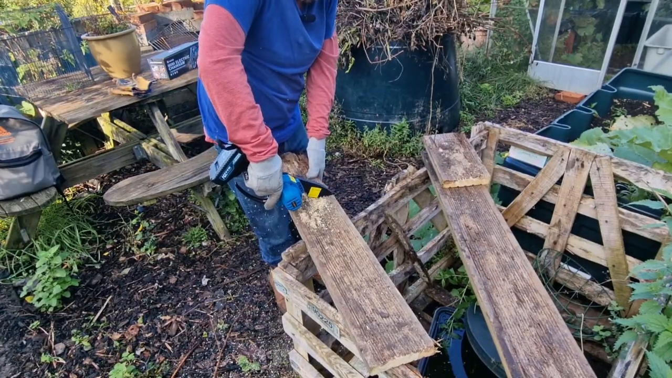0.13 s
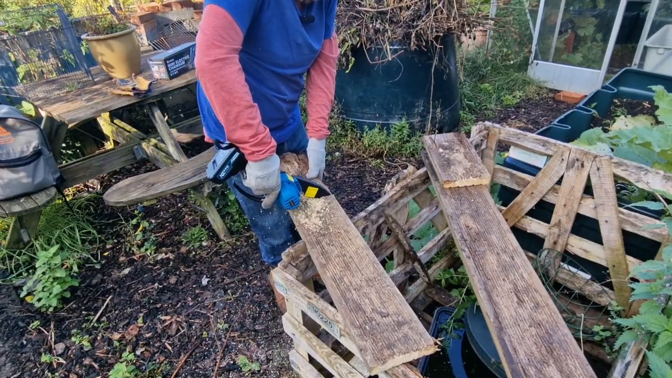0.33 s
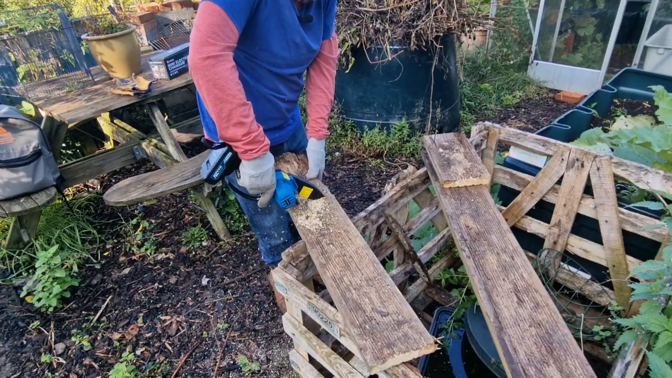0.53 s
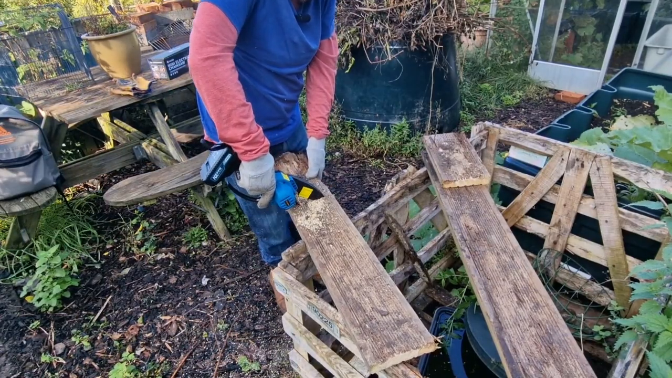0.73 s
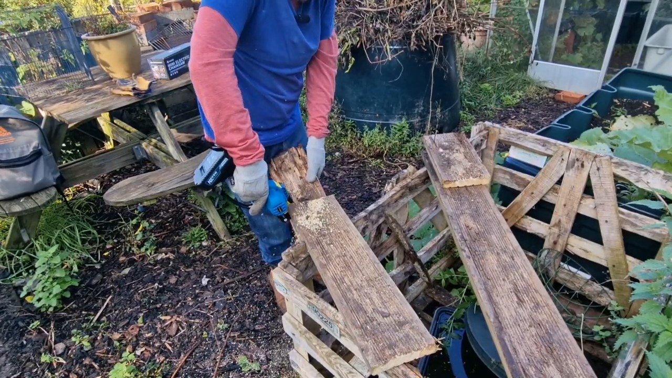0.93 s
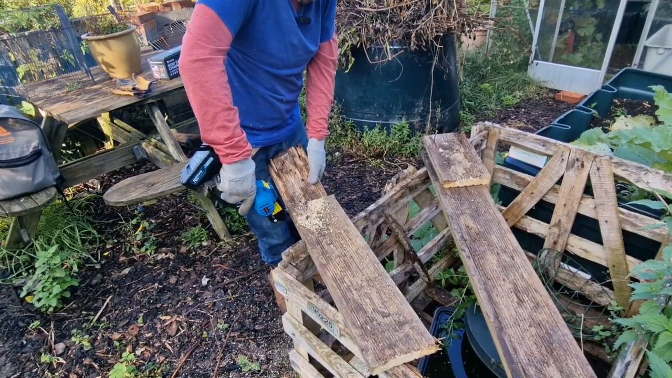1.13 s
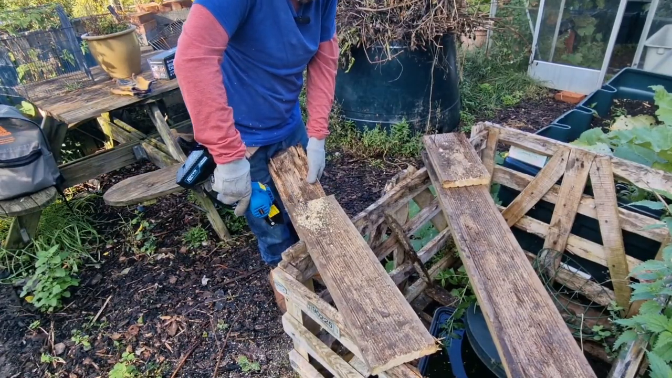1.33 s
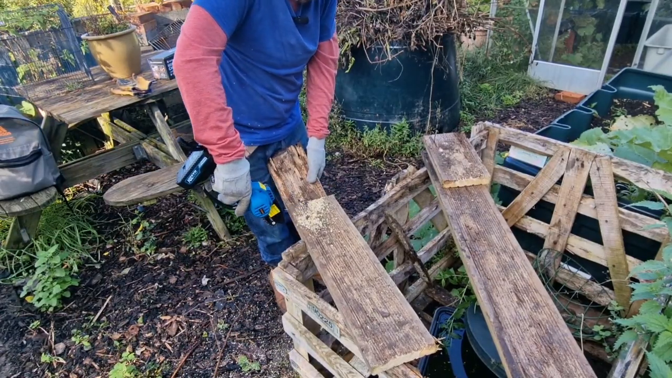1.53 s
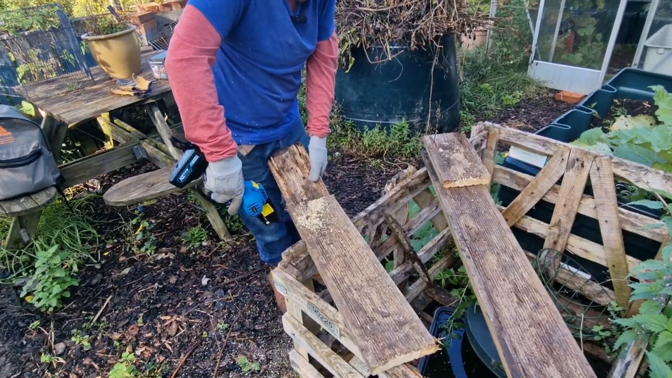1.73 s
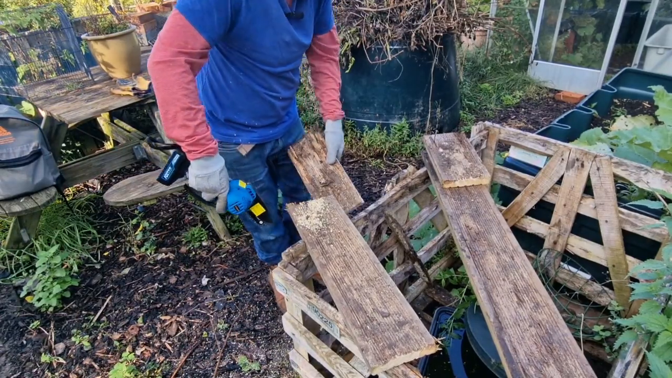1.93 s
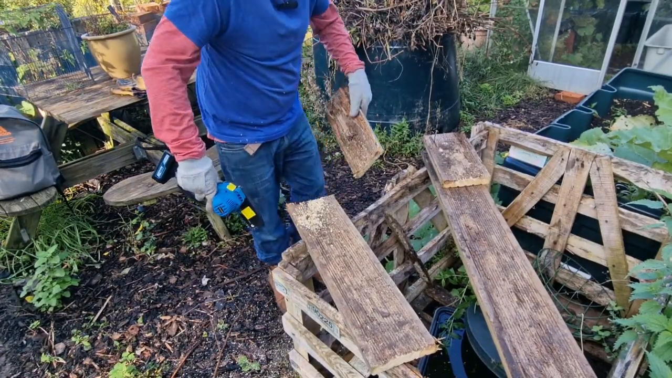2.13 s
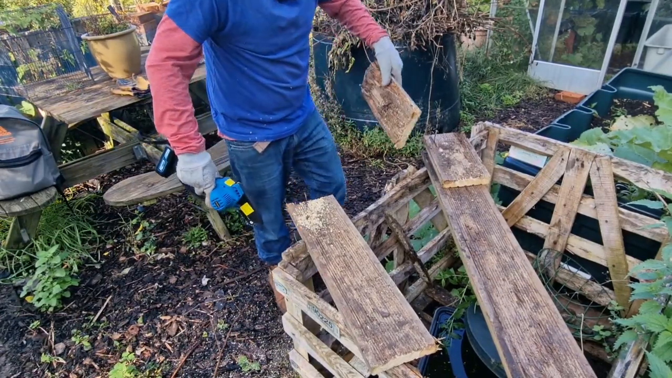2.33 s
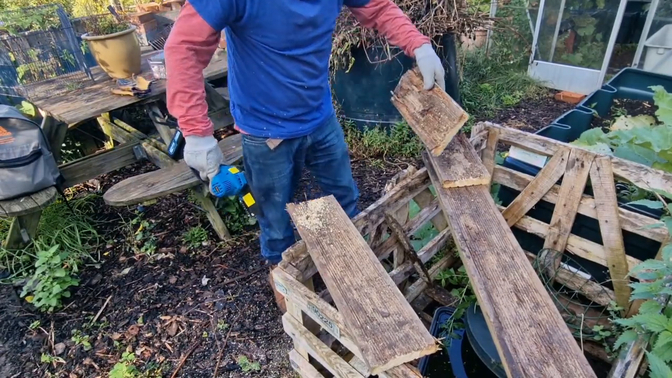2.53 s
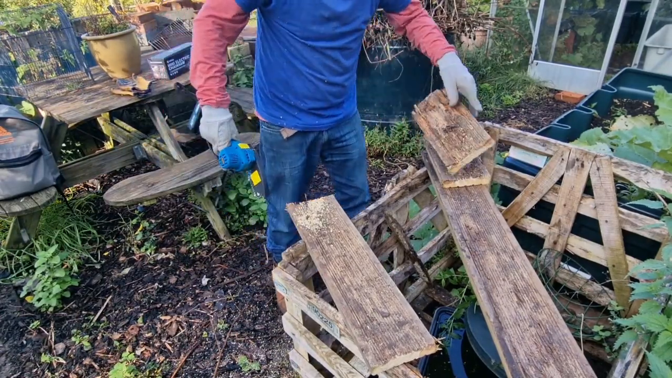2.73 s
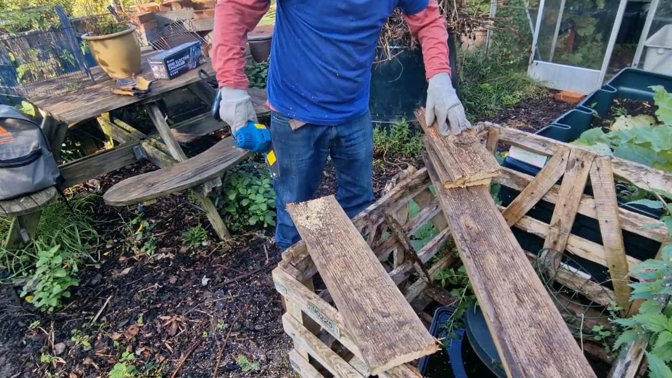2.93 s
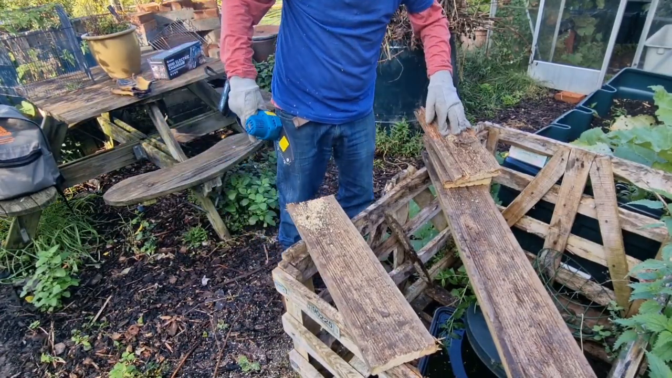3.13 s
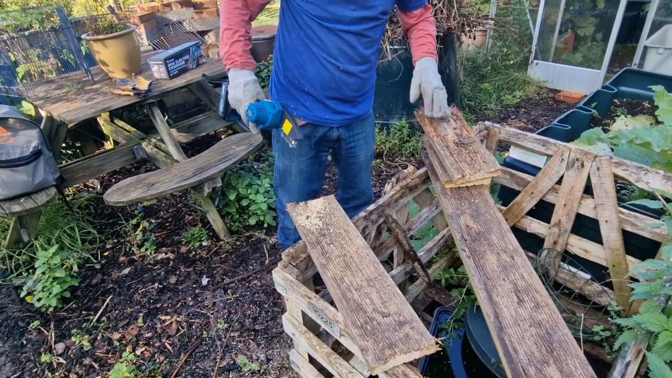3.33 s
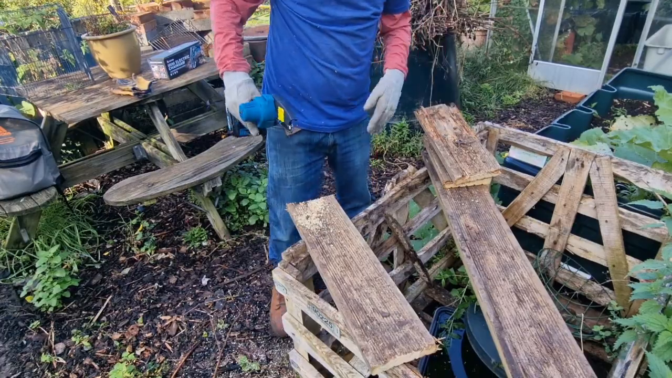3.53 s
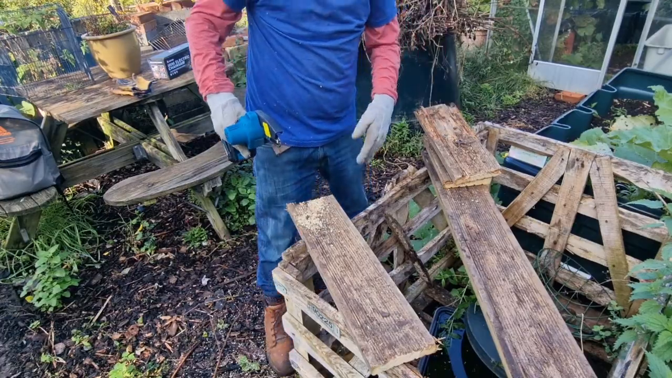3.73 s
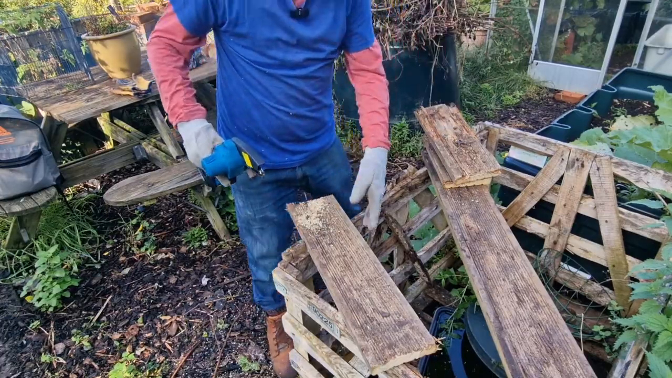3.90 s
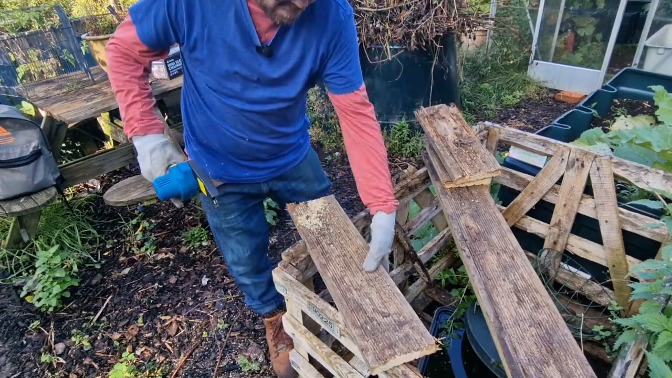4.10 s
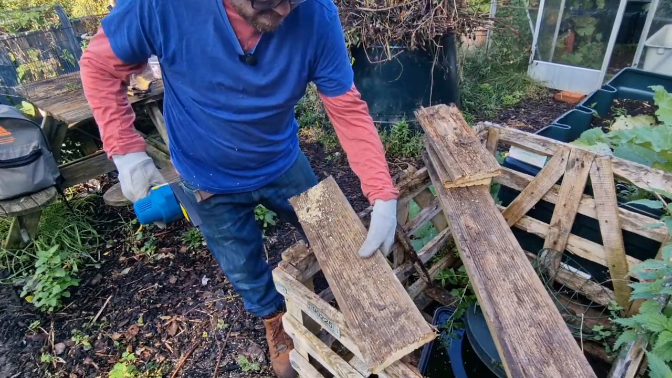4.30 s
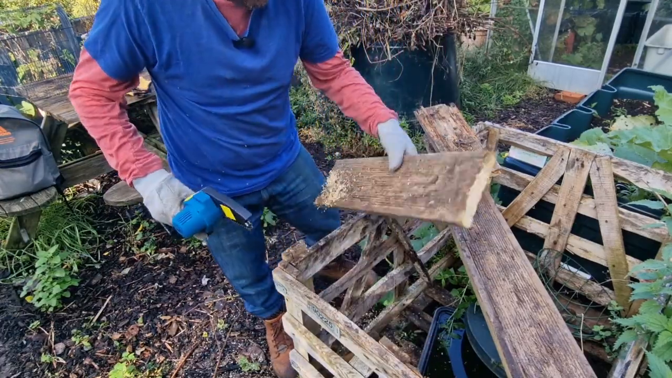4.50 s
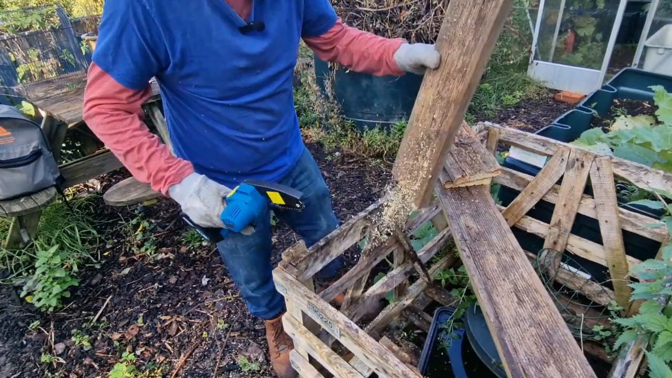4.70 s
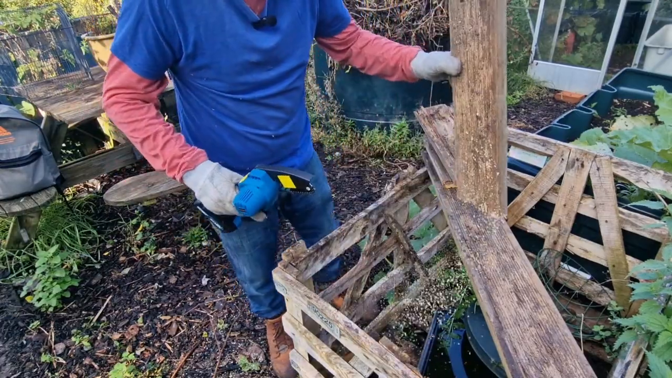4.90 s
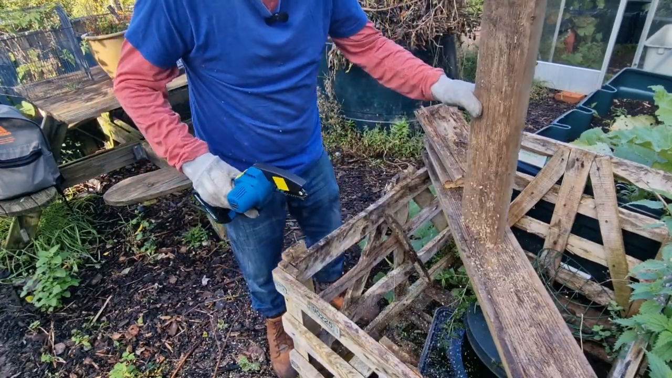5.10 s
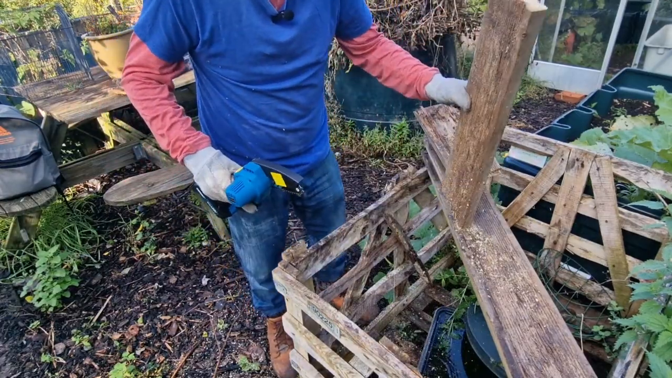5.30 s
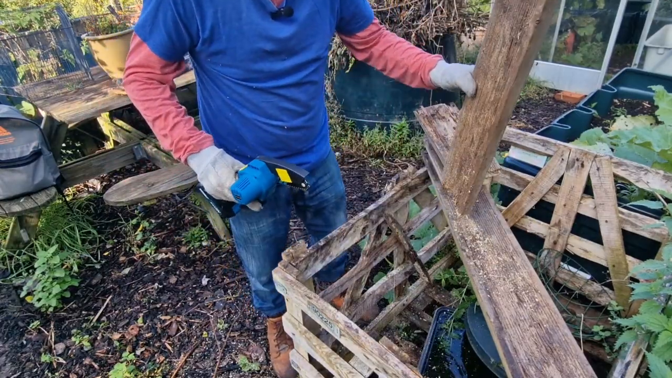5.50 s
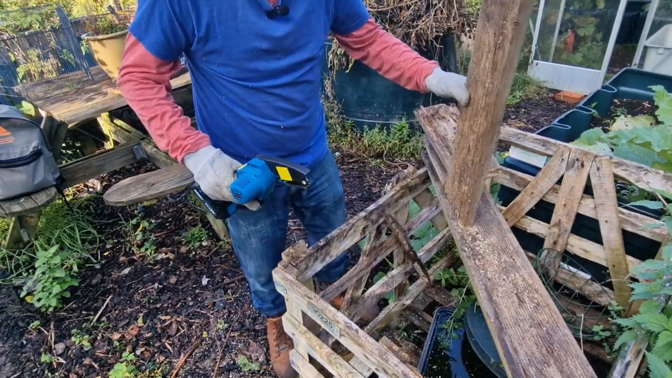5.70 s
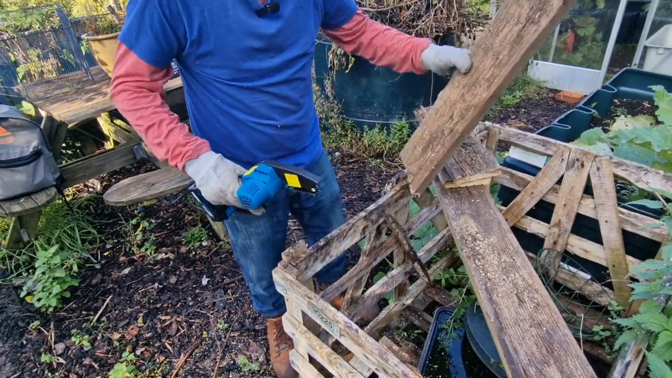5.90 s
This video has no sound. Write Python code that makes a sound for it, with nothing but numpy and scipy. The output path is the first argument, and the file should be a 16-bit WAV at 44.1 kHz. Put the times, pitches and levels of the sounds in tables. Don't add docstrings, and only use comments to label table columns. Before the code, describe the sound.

Outdoors, a harsh chainsaw buzz ends within two seconds; a wood offcut clatters down, cloth rustles, and a plank is knocked on end.

```python
import sys
import numpy as np
from scipy import signal
from scipy.io import wavfile
from scipy.ndimage import uniform_filter1d

SR = 44100
rng = np.random.default_rng(int(sys.argv[2]) if len(sys.argv) > 2 else 0)


def waveform_to_disk(signal):
    frames = np.transpose(np.atleast_2d(signal))
    scaled = np.clip(frames, -1, 1) * 32767
    samples = np.round(scaled).astype(np.int16)
    wavfile.write(sys.argv[1], SR, samples)


def ratio(d):
    e = np.asarray(d, float) / 20
    return 10 ** e


N = 262395
T = np.arange(N) / SR

# (time [s], chain sizzle level [dB])
SAW_LEVEL = [(0, -13.5), (.1, -14.5), (.19, -14), (.25, -14.5), (.33, -14.5), (.4, -12.5), (.52, -14),
             (.6, -13), (.75, -11.5), (.88, -11.5), (1.1, -12), (1.36, -19), (1.54, -28.5), (1.58, -39),
             (1.63, -47.5), (1.665, -84)]
# (time [s], shaft rate [Hz])
SHAFT_SPEED = [(.43, 277), (.526, 268), (.575, 332), (.62, 347), (.7, 354), (.84, 363), (.9, 360),
               (.94, 390), (1, 398), (1.135, 400), (1.3, 262), (1.66, 30)]
# (frequency [Hz], density [dB per Hz])
STEEL_BURIED = [(710, -43), (1200, -17), (1510, -15.5), (1790, -1.5), (2130, -3), (2450, -10.5),
                (3150, -6.5), (3790, 1.5), (4650, -12), (6030, -9), (7410, -1), (9110, -9.5), (12300, -0.5),
                (13900, 6), (15200, 0), (16000, -10)]
# (frequency [Hz], density [dB per Hz])
STEEL_LOOSE = [(710, -36.5), (1200, -15), (1320, -29), (1810, -7), (2090, -4), (2560, -16.5), (3790, -3),
               (4700, -15), (7410, -5), (8170, -4), (9010, -11.5), (9820, -10.5), (11500, -4), (12800, 2.5),
               (13600, 3), (14200, 3), (16000, -7.5)]
# (frequency [Hz], density [dB per Hz])
STEEL_FREE = [(710, -46), (1200, -25.5), (1400, -18.5), (1770, -2), (2200, -6), (3010, -16), (3590, -3.5),
              (4450, -15.5), (6100, -17), (7170, -8.5), (8000, -10), (8900, -10), (9930, -12), (12700, -7),
              (14200, 3), (16000, -9.5)]
# (time [s], level over the sizzle [dB])
CHAIN_STRIKES = [(.671, 4), (.955, 4), (1.112, 5), (1.153, 4), (1.186, 5.5), (1.211, 8), (1.258, 7),
                 (1.284, 5), (1.307, 7.5), (1.338, 7), (1.373, 5), (1.402, 4.5), (1.433, 3.5), (1.461, 4),
                 (1.513, 7), (1.56, 4), (1.61, 4), (1.652, 8)]
# (time [s], level over the rumble [dB])
CUTTER_GRABS = [(.005, 7), (0.022, 3), (0.043, 4), (0.069, 9.5), (0.103, 9), (0.128, 4.5), (.152, 6),
                (0.166, 6), (.198, 7), (0.211, 8), (0.243, 11), (.254, 4), (0.283, 10.5), (0.335, 8.5),
                (.312, 4), (0.369, 8.5), (.395, 5), (.421, 4), (0.441, 5), (.456, 3), (.519, 7)]
# (frequency [Hz], density [dB per Hz])
BOARD_RUMBLE = [(29, -49), (50, -20), (144, -6), (293, -5), (375, -3), (440, -2), (764, -3.5), (963, 1.5),
                (1210, -9.5), (1600, -14.5), (2080, -43), (3520, -120)]
# (frequency [Hz], density [dB per Hz])
HOUSING_HUM = [(29, -43.5), (50, -18), (87, -29), (216, -18.5), (330, -8.5), (494, -5), (786, -3),
               (1080, -2), (1330, -9.5), (1600, -18.5), (2080, -29), (3520, -120)]
# (start [s], end [s], start level [dB], end level [dB])
UNBALANCE_SPELLS = [
    (.55, .9, -35.5, -52),
    (.99, 1.14, -45, -44),
    (1.15, 1.33, -44, -53),
]
# (start [s], end [s], start level [dB], end level [dB])
OCTAVE_SPELLS = [
    (.435, 0.576, -24, -20.5),
    (0.595, .703, -27, -20),
    (.72, .778, -24, -28),
    (.8, .845, -26, -26),
    (.857, .89, -31, -32),
    (.95, 1.06, -35, -38),
    (1.07, 1.14, -33, -37),
    (1.302, 1.5, -45, -58.5),
]
# (time [s], body level [dB], hardness tilt [dB per octave], crack level [dB], crack t60 [s])
OFFCUT_BLOWS = [
    (2.847, -6.5, -4, -25.5, 0.066),
    (2.863, -18, 2, -46, .02),
    (2.873, -28, 17, -31, 0.045),
    (2.889, -2.5, 3.5, -36, 0.044),
    (2.9, -8.5, 3.5, -28, 0.057),
    (2.908, -24, -3, -15.5, 0.043),
    (2.914, -16, 3, -23, 0.06),
    (2.93, -27, 8, -36, 0.018),
    (2.948, -22, 2, -36, .04),
    (2.975, -40, -18, -45, 0.022),
]
# (time [s], body level [dB], hardness tilt [dB per octave], crack level [dB], crack t60 [s])
PLANK_BLOWS = [(5.103, -5, -3, -36, .02), (5.109, -1.5, 1, -38, .03), (5.118, -7, 3, -38, 0.023),
               (5.134, -17, 4, -45, .02), (5.165, -14.5, 4, -30, .02), (5.179, -18, 1, -28, 0.024),
               (5.3595, -36, 12, -13, 0.04), (5.3632, -29.5, 7, 3, 0.009), (5.366, -27, -4, -16, .05),
               (5.371, -22, 2, -25.5, 0.12), (5.397, -29, 6.5, -43, 0.033), (5.41, -27.5, -13, -50.5, .03),
               (5.44, -38, -11, -52, .03), (5.676, -44, -3, -22, 0.04), (5.6805, -11, -3, 0, 0.011),
               (5.691, -9, -1.5, -22, 0.04), (5.727, -14, -5, -55, .02), (5.762, -27, 0.5, -54.5, 0.017),
               (5.785, -42, -14, -50, .02)]
# (frequency [Hz], level [dB], t60 [s])
OFFCUT_MODES = [(164, -4, 0.094), (203, 5.5, 0.084), (270, 7.5, 0.074), (336, 4, 0.09), (444, 5, 0.074),
                (582, 6, 0.074), (716, 0, 0.07), (876, 2, 0.045), (1040, -17, 0.06), (1427, -18.5, 0.052),
                (1793, -11.5, 0.04), (2190, -33, 0.038), (2770, -33, 0.035), (3540, -33, 0.031),
                (4120, -47, 0.036)]
# (frequency [Hz], level [dB], t60 [s])
PLANK_MODES = [(98, -15, 0.11), (152.6, -1, 0.069), (216, -9, 0.16), (294.4, 5.5, 0.079), (367, 2.5, 0.052),
               (458, 4.5, 0.057), (594, 2.5, 0.057), (736, 0, 0.086), (878, -15, 0.13), (1019, -12, 0.07),
               (1366, -28, 0.08), (1790, -24, 0.058), (2130, -35, 0.027), (2530, -26.5, 0.043),
               (3170, -35, 0.023)]
# (frequency [Hz], density [dB per Hz])
STACK_SCRAPE = [(1760, -39), (3000, -7.5), (4320, -12), (5420, -18.5), (6300, -11), (11500, -6.5),
                (15100, -2.5), (16200, -3), (16500, -22)]
# (frequency [Hz], density [dB per Hz])
GRIT_CRACK = [(880, -37), (1500, -20), (2550, -6.5), (3250, -16.5), (4010, -3.5), (5200, -13.5),
              (6170, -7.5), (12100, -3), (14500, -3.5), (16500, -19)]
# (time [s], peak level [dB], frequency [Hz], t60 [s])
LONE_RINGS = [(.9071, -16.5, 381, 0.22), (.9073, -16.5, 391, 0.22), (.95, -32, 200, .06),
              (.907, -8.5, 630, 0.023), (.988, 1, 2250, 0.012), (.988, -5.5, 2580, 0.019),
              (.9072, -20, 170, 0.06), (1.025, -3.5, 2401, 0.0075), (2.62, -34, 518.4, 0.024),
              (2.572, -33.5, 800, .02), (3.31, -31.5, 1010, 0.039), (4.262, -30.5, 157.4, 0.034),
              (5.57, -40, 2000, 0.019), (5.365, -18, 128, 0.11), (2.8905, -3.5, 880, .07),
              (2.889, -18, 1850, .03), (2.899, -12, 1000, .04), (2.948, -18, 750, .03),
              (2.862, -9, 620, .05), (2.858, -12, 480, .05), (2.873, -15, 200, .05), (2.852, -12, 260, .05),
              (2.869, -12, 300, .04), (2.916, -10, 480, .04), (2.976, -34, 320, .04),
              (2.993, -44, 2100, .02), (5.1035, -9, 340, .03), (5.109, -5, 620, .03), (5.15, -24, 130, .08),
              (5.18, -22, 1000, .04), (5.206, -32, 110, .06), (5.119, -9, 900, .03), (5.122, -12, 260, .04),
              (5.17, -24, 700, .05), (5.192, -27, 720, .08), (5.374, -23, 750, .07), (5.385, -26, 200, .08),
              (5.686, -10, 650, .03), (5.684, -9, 300, .05), (5.692, -6, 300, .04), (5.729, -14, 210, .04),
              (5.735, -16, 300, .04), (5.758, -24, 200, .05), (5.76, -28, 750, .04), (5.787, -32, 250, .04),
              (1.513, -30, 3700, .02), (1.652, -46, 2000, .015), (1.652, -50, 900, .015),
              (.286, -18, 120, .05), (.012, -17, 450, .02), (2.93, -21, 2560, 0.019),
              (2.93, -27, 2050, 0.025)]
# (time [s], level [dB], centre [Hz], half width [Hz], t60 [s])
SCUFFS = [(2.608, -50, 1800, 800, .3), (2.66, -54, 4000, 300, .04), (2.612, -58, 5800, 400, .1),
          (5.6935, -22, 9500, 5500, .015), (5.6805, -22, 14500, 1300, .012), (2.889, -30, 2600, 1500, .1),
          (5.105, -32, 2200, 1100, .12), (5.14, -36, 1000, 500, .2), (5.364, -30, 2000, 500, .05),
          (5.7, -34, 700, 450, .25), (5.059, -42, 11000, 900, .01), (5.071, -42, 11000, 900, .01),
          (5.155, -40, 5500, 1800, .012), (4.991, -40, 13500, 900, .02), (5.163, -36, 14800, 900, .015),
          (5.237, -40, 7600, 700, .012), (5.256, -40, 15000, 700, .012), (2.447, -55, 2500, 1200, .05),
          (2.846, -34, 2400, 900, .04), (2.261, -48, 12500, 2500, .03), (4.8701, -32.1, 7101, 1261, .161),
          (4.8721, -34.1, 14501, 2201, .081), (2.9001, -46.1, 1801, 731, .271),
          (5.1171, -17.1, 8001, 601, .0121), (5.1021, -17.6, 9901, 2401, .0101),
          (4.2471, -40.1, 11501, 2301, .061)]
# (time [s], peak level [dB], frequency [Hz])
GRIT_TICKS = [(2.1251, -49, 13530), (2.2608, -33.5, 13880), (2.2812, -37, 9340), (2.5721, -31.5, 13600),
              (2.5894, -38.5, 12680), (2.7477, -38, 12700), (2.8114, -38.5, 13490), (3.0724, -40, 13290),
              (3.1318, -31, 14670), (3.3089, -21, 12300), (3.3942, -35, 14300), (4.247, -25, 10820),
              (4.5244, -31, 15130), (4.6324, -42, 14380), (4.9686, -30, 12000), (5.0094, -34, 13560),
              (5.1544, -28.5, 15050), (5.227, -24, 10100), (5.5353, -38, 5930), (5.8112, -36, 8690),
              (5.891, -38.5, 10300)]
# (start [s], length [s], rustle level [dB], rub relative to rustle [dB])
CLOTH_STROKES = [(2.26, .3, -64, -2), (2.564, 0.14, -52, -11), (2.734, 0.085, -49.5, -6.5),
                 (2.89, 0.21, -64, -10), (3.237, 0.29, -54, 2), (3.286, 0.045, -50.5, 1),
                 (3.45, 0.54, -75, 0.5), (4.01, 0.35, -47.5, -7), (4.287, 0.17, -53.5, -4.5),
                 (4.45, 0.71, -52.5, -7.5), (4.85, .05, -58, -5), (4.906, 0.41, -43, -3),
                 (5.149, 0.13, -43.5, -12), (5.266, 0.11, -60, -7), (5.37, 0.13, -54, -13),
                 (5.447, .2, -60, -8), (5.677, 0.21, -60, -6), (5.882, .03, -60, -4.5)]
# (frequency [Hz], density [dB per Hz])
RUSTLE_COLOUR = [(2940, -37), (5000, -17), (6660, -12.5), (8250, -8.5), (9280, -9.5), (11400, -4),
                 (14200, -2.5), (14900, -2.5), (16000, -10)]
# (frequency [Hz], density [dB per Hz])
RUB_COLOUR = [(880, -35), (1500, -11.5), (2180, -6.5), (2370, -8.5), (2990, -3), (3920, 1), (5070, -9.5),
              (7000, -9), (9100, -29.5), (15400, -120)]
# (time [s], level [dB])
TRAFFIC_LEVEL = [(.85, -68), (1.0, -56), (1.6, -56), (1.75, -60), (1.93, -61), (2.2, -59.5), (2.6, -53),
                 (3.85, -54.5), (4.3, -49), (5.05, -48), (5.19, -54), (5.95, -55.5)]
# (frequency [Hz], density [dB per Hz])
ROAD_COLOUR = [(15, -44), (25, -24.5), (40, -8), (57, 0), (75, -9), (110, -12), (217, -20.5), (263, -14.5),
               (301, -18.5), (335, -16.5), (516, -17), (840, -16), (2410, -33), (3820, -32.5), (8140, -38),
               (13600, -37), (16000, -41)]
# (start [s], length [s], start pitch [Hz], top pitch [Hz], level [dB])
BIRD_NOTES = [
    (4.39, .38, 7830, 8110, -66),
    (5.33, .25, 5380, 5475, -68),
    (5.72, .2, 3580, 3800, -64),
]


def chain():
    shaft_hz = curve(SHAFT_SPEED, 1)
    loops = np.cumsum(shaft_hz) / SR / 14
    links_db = 0
    for k, db in enumerate([0.65, 0.65, 0.32, 0.95], 1):
        links_db = links_db + db * np.cos(2 * np.pi * (k * loops + rng.random()))
    strikes_db = bumps_db(CHAIN_STRIKES, .0011)
    slaps = grains(25 * shaft_hz, 1.9)
    slaps /= np.sqrt(uniform_filter1d(slaps ** 2, 4000) + 1e-9)
    slaps = patchy(slaps + .5 * rng.standard_normal(N), 1.6)
    slaps *= ratio(links_db + strikes_db + 0.56 * wander(150))

    loose, free = bar_state()
    steel = np.sqrt(1 - loose) * coloured(slaps, STEEL_BURIED)
    steel += np.sqrt(loose * (1 - free)) * coloured(slaps, STEEL_LOOSE)
    steel += np.sqrt(free) * coloured(slaps, STEEL_FREE)
    bar_ring = free * np.clip(shaft_hz / 340, 0, 1) * ratio(-15) * band(slaps, 8500, 9400)

    sizzle = ratio(saw_db()) * band(steel, 9800, 17000)
    bar_db = saw_db(buried_db=-3.5, loose_db=-4, free_db=-6, share=0.82)
    bar = ratio(bar_db) * (band(steel, 5000, 9960) + bar_ring)
    housing_db = saw_db(buried_db=-7.5, loose_db=-8.5, free_db=-14.5, share=0.66)
    housing = ratio(housing_db + .45 * grabs_db()) * band(steel, 1250, 5000)
    return saw_turning() * (sizzle + bar + housing)


def cutters():
    cutting = np.clip((.53 - T) / .04 + .5, 0, 1)
    board = coloured(grains(2000, 2.6) * ratio(1.01 * grabs_db() - 5.5), BOARD_RUMBLE)
    housing = coloured(rng.standard_normal(N) * ratio(1.1 * wander(50)), HOUSING_HUM)
    mixed = cutting * board + ratio(-6) * (1 - cutting) * housing
    rumble_db = saw_db(buried_db=-9.5, loose_db=-7.5, free_db=-15, share=0.66)
    return ratio(rumble_db) * saw_turning() * mixed


def motor():
    turns = np.cumsum(curve(SHAFT_SPEED, 1) * (1 + 0.005 * wander(40))) / SR
    edge_s = 0.016
    out = np.zeros(N)
    for k, spells in enumerate([UNBALANCE_SPELLS, OCTAVE_SPELLS], 1):
        level = np.zeros(N)
        for start, end, start_db, end_db in spells:
            gate = ramp(start - edge_s / 2, end + edge_s / 2, edge_s, edge_s)
            level += gate * ratio(np.interp(T, [start, end], [start_db, end_db]))
        out += level * ratio(1.9 * wander(25)) * np.cos(2 * np.pi * k * turns)
    return np.sqrt(2) * out


def knocks(blows, modes, grit):
    out = np.zeros(N)
    t = np.arange(4000) / SR
    for s, body_db, tilt_db, crack_db, crack_t60 in blows:
        rattle_s = 0.0071 * 2 ** (-np.clip(tilt_db, -9, 9) / 14)
        push_noise, crack_noise = rng.standard_normal((2, len(t)))
        response = np.zeros(len(t))
        for hz, db, t60 in modes:
            level = ratio(db + tilt_db * np.log2(hz / 500))
            for k, side in enumerate(np.arange(-1, 2) + rng.uniform(-0.87, 0.72, 3)):
                response += level * (-1) ** k * ring(hz * (1 + 0.0602 * side), t60, size=4000)
        contact = push_noise * np.sqrt(t / rattle_s) * np.exp(-2.5 * t / rattle_s)
        body = band(signal.fftconvolve(response, contact), 84, 9600)
        add(out, s, ratio(body_db) * body / abs(body).max())
        crack = coloured(crack_noise, grit) * ratio(-60 * t / crack_t60) * (1 - np.exp(-t / 0.00085))
        add(out, s, ratio(crack_db) / 2 * crack)
    return out


def lone_rings():
    out = np.zeros(N)
    for s, db, hz, t60 in LONE_RINGS:
        add(out, s, ratio(db) * ring(hz, t60) * (1 - np.exp(-T[:8000] / 0.0006)))
    return out


def scuffs():
    out = np.zeros(N)
    t = T[:8000]
    for s, db, hz, half_width_hz, t60 in SCUFFS:
        hiss = band(rng.standard_normal(len(t)), hz - half_width_hz, hz + half_width_hz)
        add(out, s, ratio(db - 60 * t / t60) * (1 - np.exp(-t / 0.0021)) * hiss)
    return out


def grit_ticks():
    out = np.zeros(N)
    for s, db, hz in GRIT_TICKS:
        tick = band(rng.standard_normal(600), 0.76 * hz, 1.27 * hz)
        add(out, s, ratio(db - 11.5) * tick * ratio(-60 * T[:600] / 0.02))
    return out


def cloth():
    strokes = np.array([ramp(s, s + length, 0.37 * length, 0.42 * length) ** 2
                        for s, length, _, _ in CLOTH_STROKES])
    rustle_db, rub_db = np.array(CLOTH_STROKES)[:, 2:].T
    fibres = patchy(grains(12000, 1.8), 2.2, frames=8, bins=14) * ratio(1.3 * wander(45))
    rustle = coloured(fibres, RUSTLE_COLOUR)
    rub = coloured(rng.standard_normal(N) * ratio(1.7 * wander(30)), RUB_COLOUR)
    rustle_level = ratio(-68.5) * (T > CLOTH_STROKES[0][0]) + ratio(rustle_db) @ strokes
    rub_level = ratio(-74) + ratio(rustle_db + rub_db) @ strokes
    return rustle_level * rustle + rub_level * rub


def birds():
    out = np.zeros(N)
    for s, length, start_hz, top_hz, db in BIRD_NOTES:
        hz = start_hz + (top_hz - start_hz) * np.sin(3.1 * np.clip((T - s) / length, 0, 1))
        phase = 2 * np.pi * np.cumsum(hz * (1 + 0.0067 * wander(90))) / SR
        level = np.sqrt(2) * ratio(db + 2.1 * wander(40))
        out += ramp(s, s + length, 0.043, 0.064) * level * np.sin(phase)
    return out


def traffic():
    level_db = curve(TRAFFIC_LEVEL, 1) + 4 + 0.81 * wander(16)
    return ratio(level_db) * coloured(rng.standard_normal(N), ROAD_COLOUR)


def bar_state():
    cut_ends_s, bar_clears_s = .55, .93
    return [np.clip((T - s) / 0.078 + .5, 0, 1) for s in (cut_ends_s, bar_clears_s)]


def saw_db(buried_db=0, loose_db=0, free_db=0, share=1):
    loose, free = bar_state()
    sizzle_db = curve(SAW_LEVEL, 1)
    flinch_db = -6 * np.exp(-((T - .922) / .025) ** 2)
    spared_db = (1 - share) * np.maximum(-12 - sizzle_db, 0)
    place_db = buried_db + loose * (loose_db - buried_db) + free * (free_db - loose_db)
    return sizzle_db + flinch_db + spared_db + place_db


def saw_turning():
    return T < SAW_LEVEL[-1][0]


def grabs_db():
    grab_s = .016
    return bumps_db(CUTTER_GRABS, grab_s / 2.9, grab_s / 2)


def bumps_db(rows, width_s, late_s=0):
    t = T[:2 * SR]
    swells = sum(db * np.exp(-((t - s - late_s) / width_s) ** 2) for s, db in rows)
    return np.r_[swells, np.zeros(N - len(t))]


def patchy(x, depth_db, frames=9, bins=5):
    z = signal.stft(x, nperseg=256)[2]
    field = uniform_filter1d(rng.standard_normal(z.shape), bins, 0)
    field = uniform_filter1d(field, frames, 1)
    gain = ratio(depth_db * np.clip(evened(field), -2, 2))
    return evened(signal.istft(z * gain, nperseg=256)[1][:N])


def grains(per_s, spread_db):
    size = ratio(spread_db * np.minimum(rng.exponential(1, N), 5)) * rng.choice([-1, 1], N)
    return size * (rng.random(N) < per_s / SR)


def wander(hz):
    return evened(signal.sosfilt(signal.butter(2, hz, fs=SR, output="sos"), rng.standard_normal(N)))


def ring(hz, t60, size=8000):
    t = np.arange(size) / SR
    return ratio(-60 * t / t60) * np.sin(2 * np.pi * hz * t)


def coloured(x, points):
    f, value_db = np.transpose(points)
    hz = np.fft.rfftfreq(4096, 1 / SR)
    gain_db = np.interp(np.log(hz + 1), np.log(f + 1), value_db)
    log_gain = np.log(ratio(np.maximum(gain_db, -90)))
    full = np.r_[log_gain, log_gain[-2:0:-1]]
    taps = np.fft.ifft(np.exp(np.conj(signal.hilbert(full)))).real[:2048]
    return evened(signal.oaconvolve(x, taps)[:len(x)])


def band(x, lo_hz, hi_hz):
    sos = signal.butter(3, [lo_hz, min(hi_hz, .45 * SR)], "band", fs=SR, output="sos")
    return evened(signal.sosfilt(sos, x))


def evened(x):
    return x / np.sqrt(np.mean(x ** 2) + 1e-20)


def curve(rows, k):
    return np.interp(T, [r[0] for r in rows], [r[k] for r in rows])


def ramp(start, end, rise, fall):
    return np.clip((T - start) / rise, 0, 1) * np.clip((end - T) / fall, 0, 1)


def add(mix, s, sound):
    part = mix[round(s * SR):][:len(sound)]
    part += sound[:len(part)]


def scene():
    saw = chain() + cutters() + motor()
    offcut = knocks(OFFCUT_BLOWS, OFFCUT_MODES, STACK_SCRAPE)
    plank = knocks(PLANK_BLOWS, PLANK_MODES, GRIT_CRACK)
    details = lone_rings() + scuffs() + grit_ticks()
    return (saw + offcut + plank + details + cloth() + birds() + traffic())[None]


def roll_off(x):
    return signal.sosfilt(signal.butter(12, 16750, fs=SR, output="sos"), x)


def record(dry):
    no_bass = signal.sosfilt(signal.butter(2, 45, "high", fs=SR, output="sos"), dry)
    limited = np.clip(no_bass, -.92, .92)
    low_pass = signal.firwin(767, 15880, fs=SR)
    mix = signal.oaconvolve(limited, low_pass[None], "same")
    return roll_off(mix)


dry = scene()
out = record(dry)
waveform_to_disk(out)
```